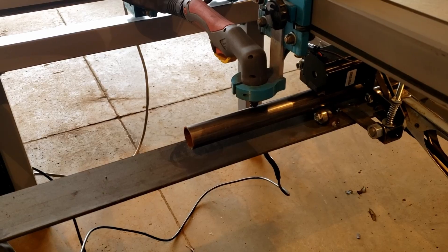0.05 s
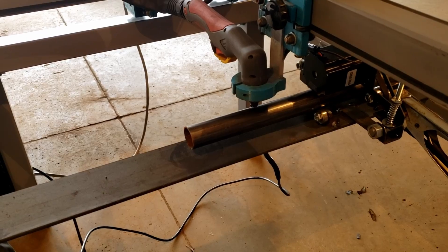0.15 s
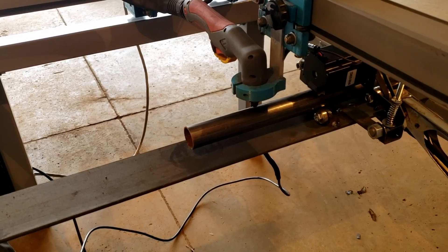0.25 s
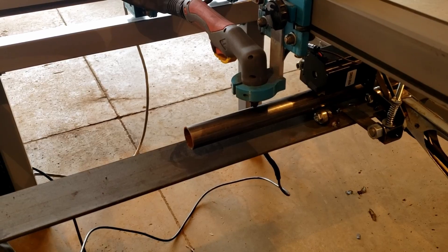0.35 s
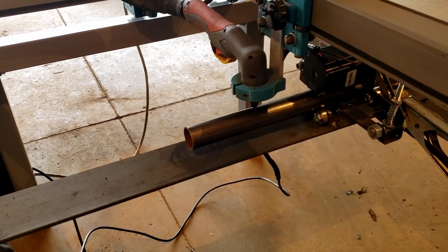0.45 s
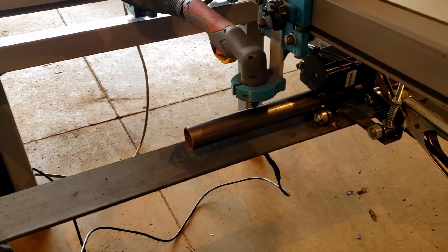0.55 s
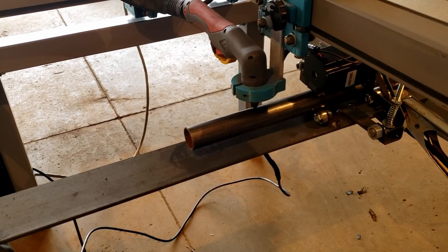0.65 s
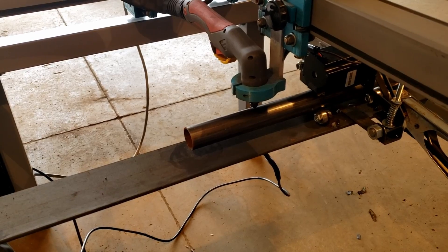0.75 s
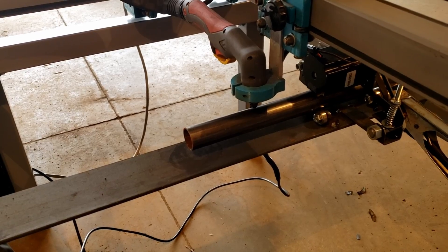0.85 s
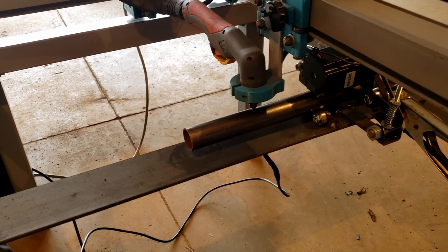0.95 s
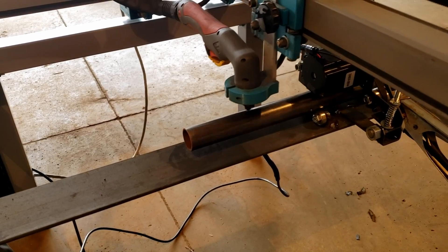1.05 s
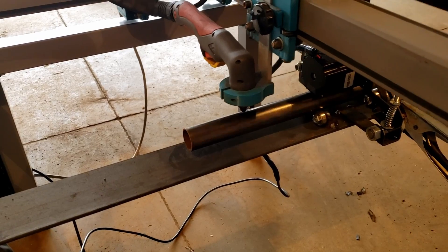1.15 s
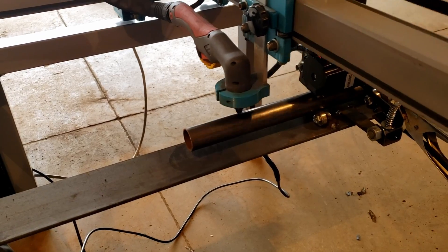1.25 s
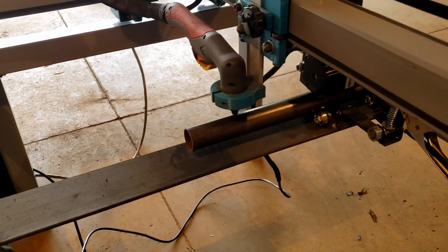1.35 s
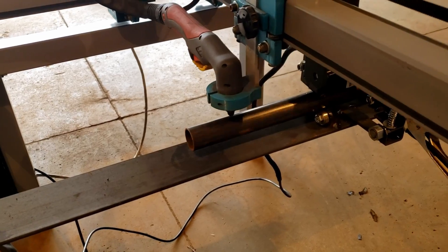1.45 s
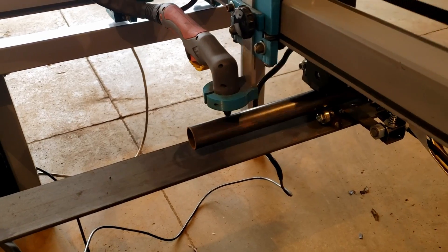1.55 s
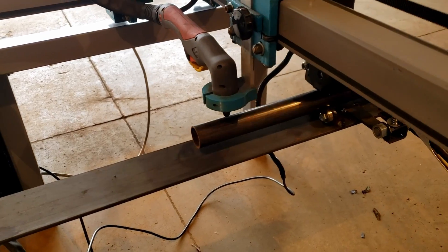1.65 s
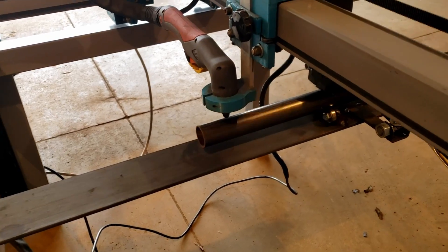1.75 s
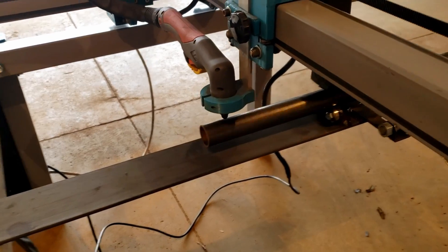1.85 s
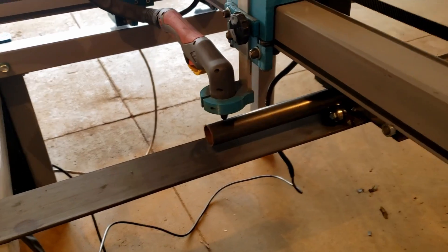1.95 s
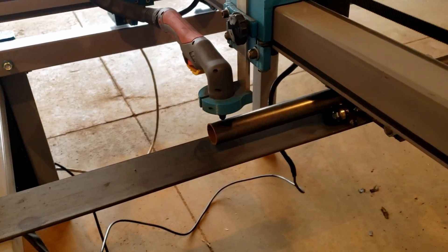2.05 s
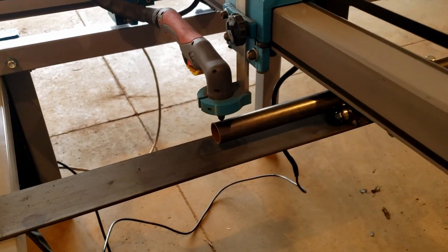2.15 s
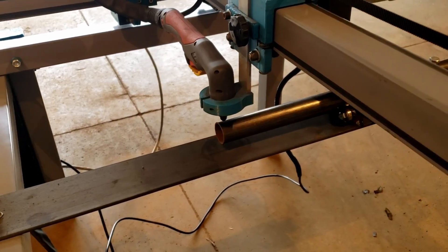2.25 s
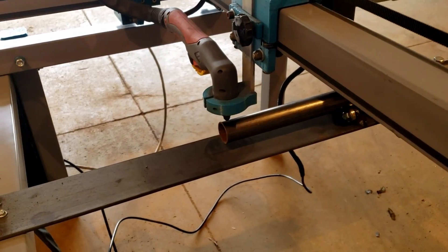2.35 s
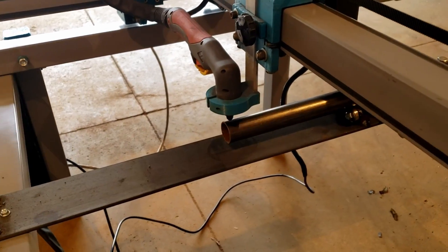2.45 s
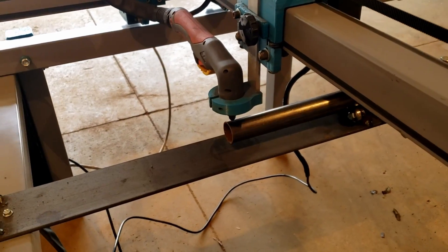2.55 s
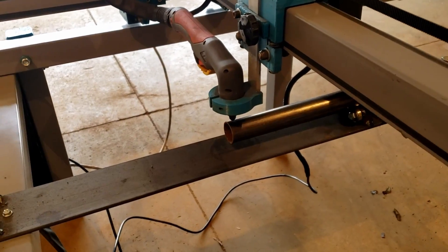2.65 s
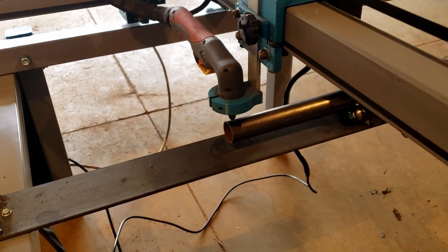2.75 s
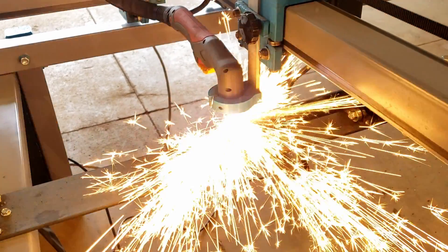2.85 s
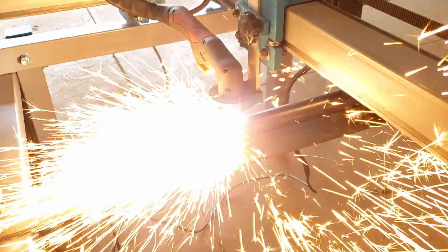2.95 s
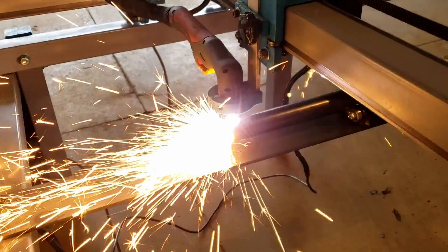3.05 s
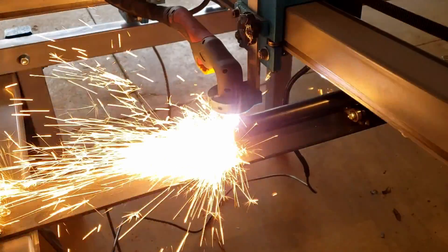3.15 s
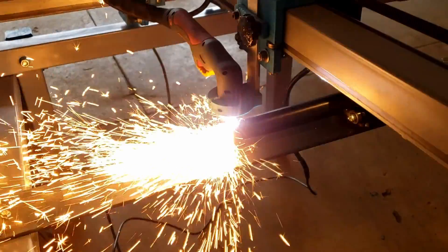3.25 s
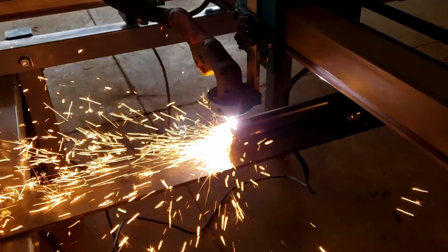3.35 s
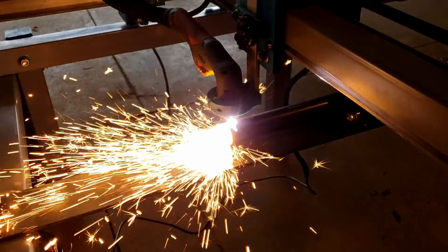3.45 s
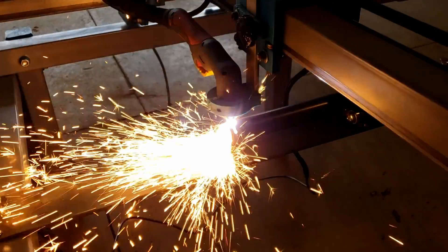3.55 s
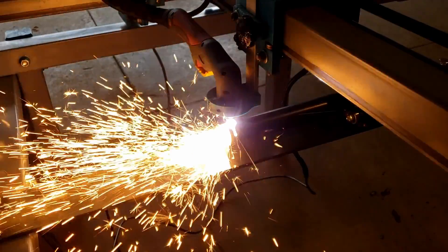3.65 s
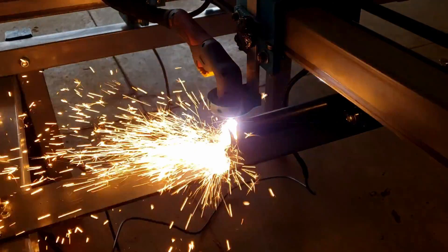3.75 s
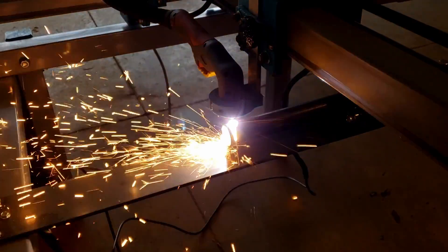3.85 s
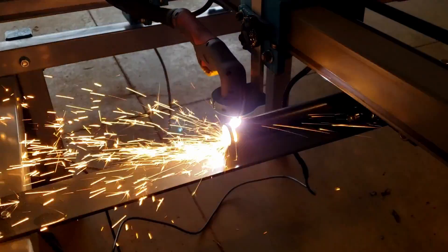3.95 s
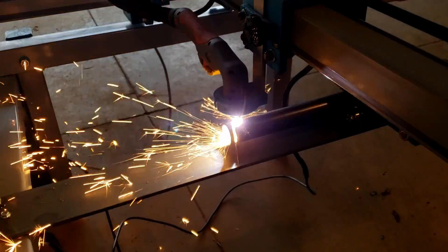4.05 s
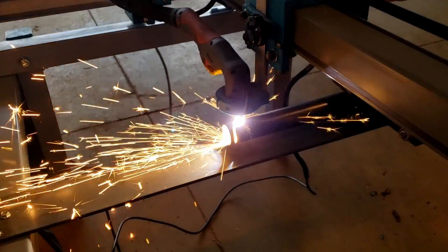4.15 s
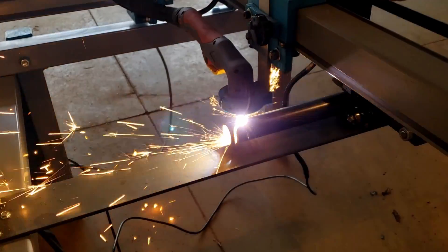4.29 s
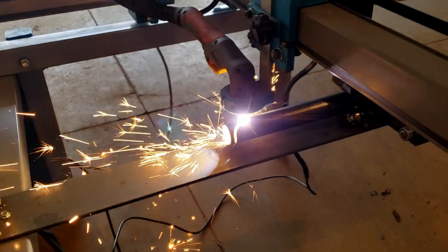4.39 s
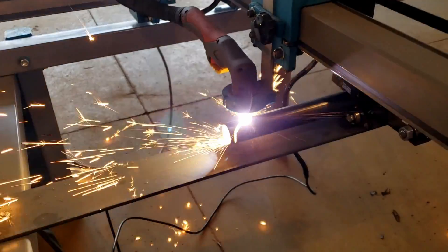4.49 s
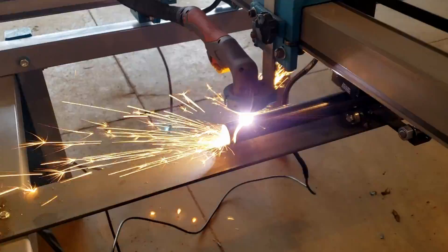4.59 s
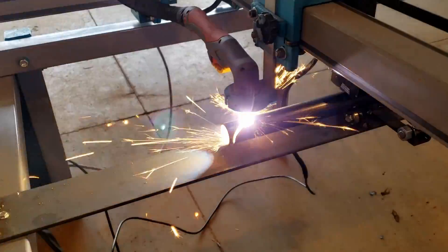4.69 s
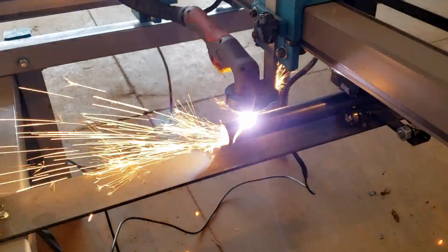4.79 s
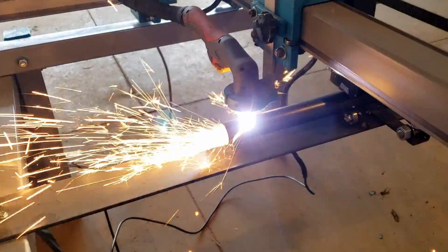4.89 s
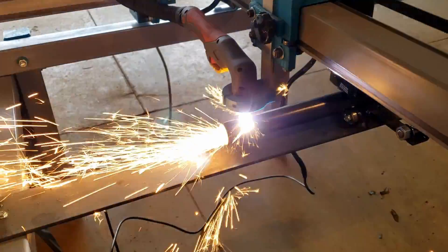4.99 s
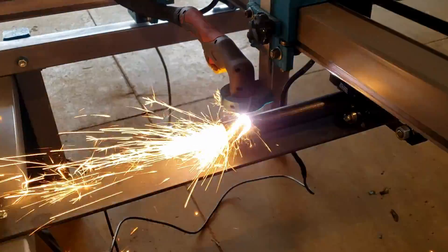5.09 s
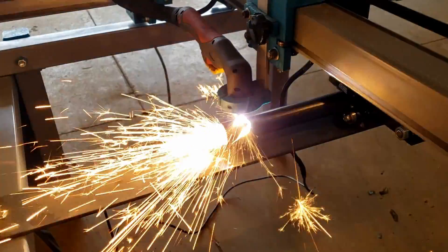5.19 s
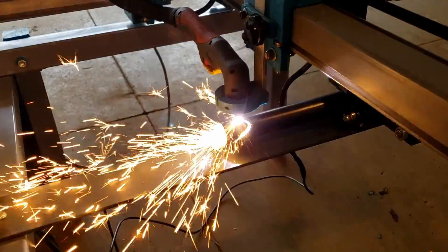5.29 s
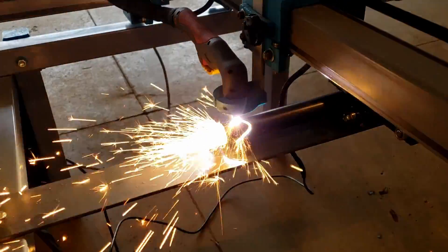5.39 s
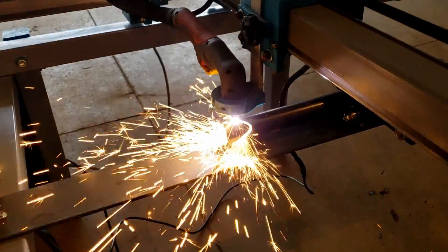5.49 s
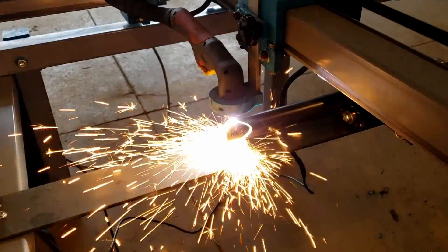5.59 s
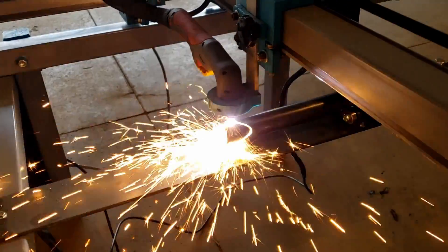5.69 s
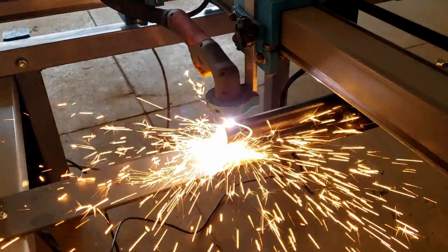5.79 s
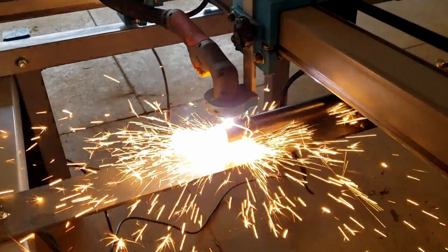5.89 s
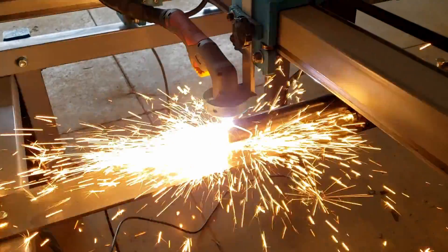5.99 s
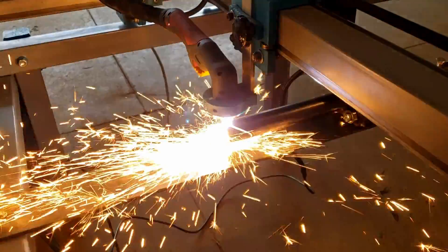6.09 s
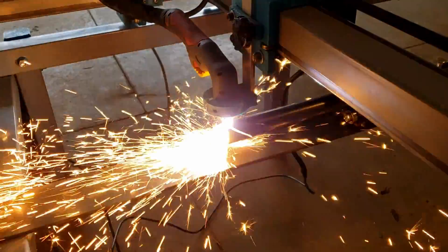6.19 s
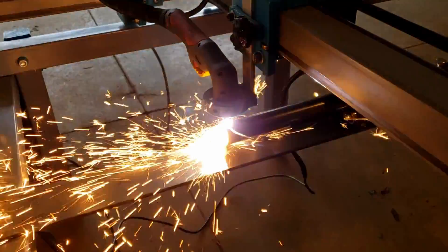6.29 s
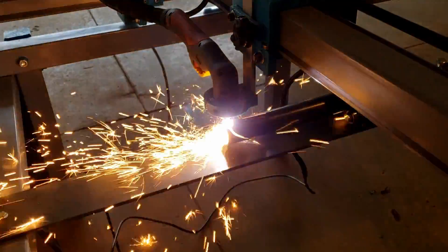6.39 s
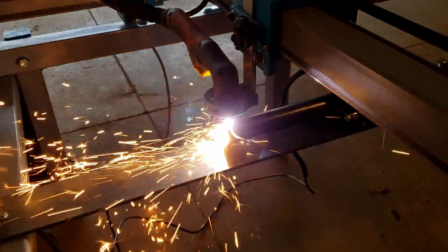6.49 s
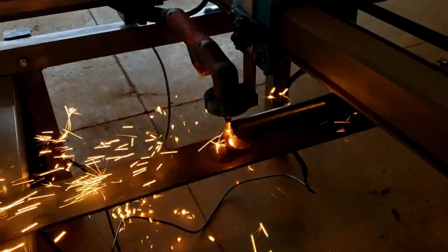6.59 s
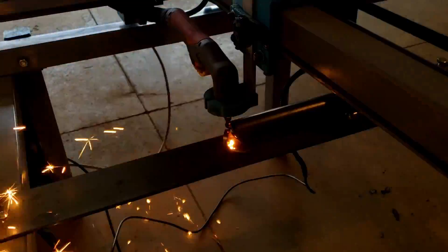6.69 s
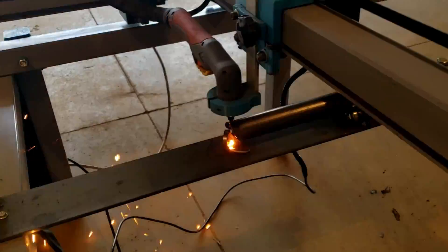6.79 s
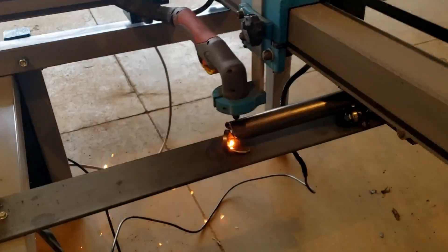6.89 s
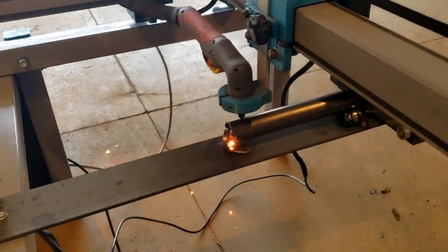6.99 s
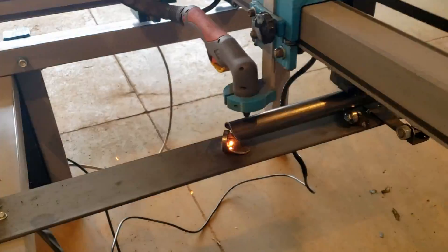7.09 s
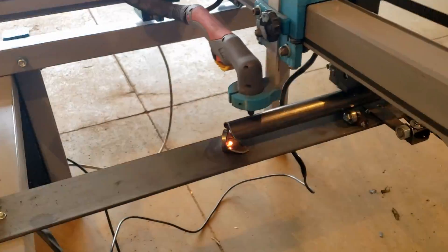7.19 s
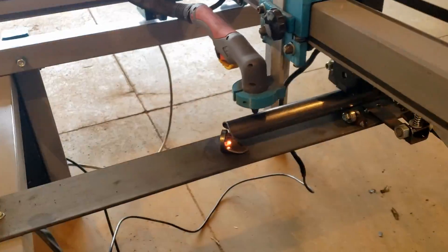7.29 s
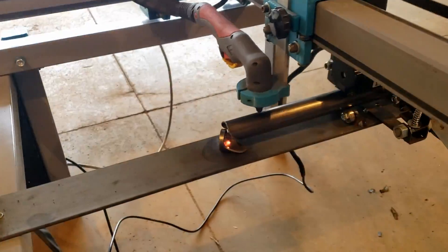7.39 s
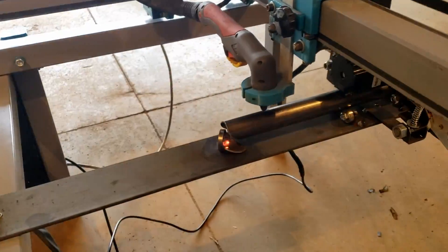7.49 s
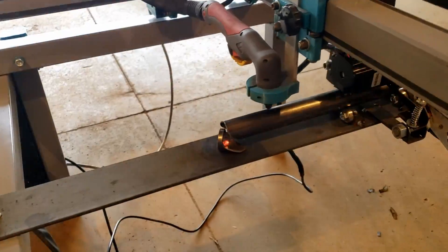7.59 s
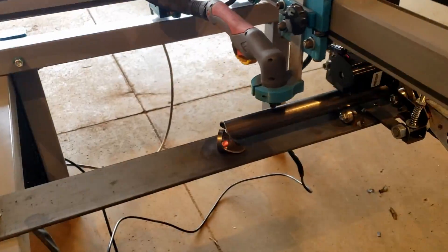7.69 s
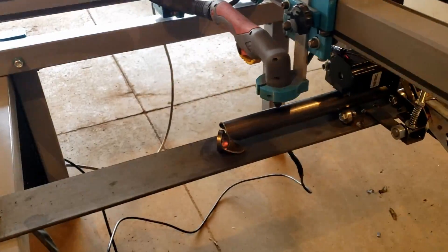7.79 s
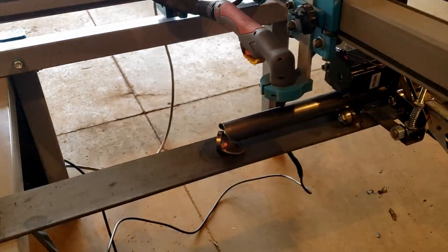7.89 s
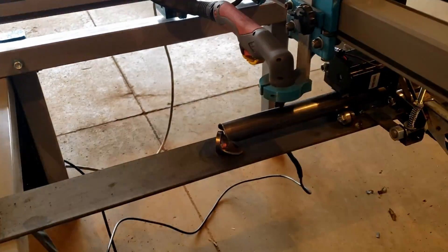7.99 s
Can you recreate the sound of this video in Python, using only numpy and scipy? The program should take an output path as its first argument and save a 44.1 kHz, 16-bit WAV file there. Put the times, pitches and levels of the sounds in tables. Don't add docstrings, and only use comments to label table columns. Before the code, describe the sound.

A workshop heard through a close hand-held stereo microphone. From 0 s, low distant rumble, a fan and leaking air; a small motor hums from 0.5 s. At 1 s a stepper carriage jerks off, rolling with a steady, many-pitched electric whine; a thin relay click at 2.0 s. It clanks and chirps to a stop around 2.25 s, then rocks with repeated small squeaks until about 2.75 s. At 2.8 s gas pops, the arc snaps, metal rings and bright noise splashes; the wall is pierced at 2.95 s. A loud fluttering hiss cuts the turning tube, flaring at times, with lumpy low overload, a thin rising whistle from 3.3 s and hollow bore tones sinking to about 4.8 s, then rising. Soft slag thuds come near 5.4 and 5.9 s. At 6.6 s a dull snap and thud end the cut. Cooling air fades, then brightens towards 8 s over faint motor hum.

```python
import sys
import numpy as np
from scipy import signal
from scipy.fft import rfft, irfft, next_fast_len
from scipy.io import wavfile
from scipy.ndimage import uniform_filter1d, map_coordinates

SR = 44100
rng = np.random.default_rng(int(sys.argv[2]) if len(sys.argv) > 2 else 0)


def file_out(sig):
    cols = np.atleast_2d(sig).T
    lim = np.clip(cols, -1, 1)
    pcm = np.round(lim * 32767).astype(np.int16)
    wavfile.write(sys.argv[1], SR, pcm)


def how_loud(loudness_db):
    steps = np.asarray(loudness_db, float) / 20
    return 10 ** steps


N = 354563

START_S, STOP_S, SPIN_UP_S, SPIN_DOWN_S = 0.98, 2.245, 0.045, 0.07
STRIKE_S, PIERCE_S, CUT_OFF_S = 2.8, 2.953, 6.63

# f/Hz, likeness/-1..1
SHOP_ALIKE = [(60, 0.87), (130, 1), (290, 0.6), (640, 0.31), (1410, -0.17), (3100, -0.1), (6820, -0.47),
              (15000, 0.086)]
# f/Hz, left minus right/dB
SHOP_LEAN = [(60, 5), (270, 3), (600, 4), (2000, 4), (5800, -2.5), (6700, 40), (8500, 11), (10000, -4),
             (12000, -2.5), (14000, 9), (15000, 5)]
# f/Hz, likeness/-1..1
JET_ALIKE = [(200, 0.25), (400, 0.89), (1000, 0.48), (2400, 0.32), (4400, 0.21), (8000, 0.34),
             (11000, 0.48), (15000, 0.48)]
# f/Hz, lead/rad
JET_LEAD = [(0, -4), (1810, 1), (2330, -0.5), (2760, 2.5), (3100, -0.1), (3790, -0.3), (4310, 0.25),
            (6200, 2.5), (6980, 8), (7920, 7.5), (11100, 9.5), (13600, 14.5), (15200, -8), (16500, 17)]
# t/s, mode spacing/Hz, echo strength/0-1
BORE = [(2.8, 500, .3), (3.15, 494, .42), (3.55, 498, .42), (3.72, 540, .3), (3.92, 562, .5),
        (4.15, 526, .5), (4.35, 478, .6), (4.62, 412, .8), (4.78, 389, .88), (4.95, 412, .86),
        (5.1, 455, .62), (5.25, 480, .62), (5.45, 494, .55), (5.7, 484, .5), (5.88, 468, .45),
        (6.1, 464, .3), (6.35, 452, .25), (6.7, 480, .2)]
# t/s, level/dB, length/s
FLARES = [
    (3.125, 5.5, 0.082),
    (3.37, 5.5, 0.051),
    (5.06, 5, 0.1),
    (5.46, -0.5, 0.026),
    (5.65, 3, 0.025),
    (6.03, 1.5, 0.04),
    (6.42, 4.5, 0.082),
    (6.55, 1, .03),
]


def unit(x):
    return x / np.sqrt(np.mean(x ** 2) + 1e-20)


def along(points, hz):
    f, v = np.transpose(points)
    return np.interp(np.log(hz + 1), np.log(f + 1), v)


def curves(rows):
    s, *cols = np.transpose(rows)
    return [np.interp(np.arange(N) / SR, s, c) for c in cols]


def gate(rows, rise_s, fall_s):
    t = np.arange(N) / SR
    rise = np.clip((t - rows[0][0]) / rise_s, 0, 1)
    return rise * np.clip((rows[-1][0] - t) / fall_s + 1, 0, 1)


def span(start, end, rise_s, fall_s):
    return gate([[start], [end]], rise_s, fall_s)


def bumps(rows):
    t = np.arange(N) / SR
    return sum(height * np.exp(-((t - s) / length) ** 2) for s, height, length in rows)


def wobble(rate):
    return map_coordinates(rng.standard_normal(int(N * rate / SR) + 4), [np.arange(N) * rate / SR])


def filtered(x, response):
    m = next_fast_len(N + 8192)
    return irfft(rfft(x, m) * response(np.fft.rfftfreq(m, 1 / SR)), m)[..., :N]


def resonances(peaks):
    def response(f):
        return sum((-1) ** k * how_loud(db) * 1j * f * w / (c * c - f * f + 1j * f * w)
                   for k, (c, w, db) in enumerate(peaks))
    return response


def patchy(depth_db, shape=lambda hz, t: 1):
    hz, t, z = signal.stft(rng.standard_normal((2, N)), SR, nperseg=1024)
    field = uniform_filter1d(rng.standard_normal(z.shape[1:]), 10, 0)
    field = uniform_filter1d(field, 5, 1)
    z = z * how_loud(depth_db * unit(field)) * shape(hz[:, None], t)
    return signal.istft(z, SR, nperseg=1024)[1][:, :N]


def spread(pair, gain, alike, lean, lead=((1, 0),)):
    def mix(hz):
        turn = np.arccos(np.clip(along(alike, hz), -1, 1)) / 2
        phase = np.exp(.5j * np.outer([1, -1], along(lead, hz)))
        share = phase / np.sqrt(1 + how_loud(np.outer([-1, 1], along(lean, hz))) ** 2)
        both = np.array([[np.cos(turn), np.sin(turn)], [np.cos(turn), -np.sin(turn)]])
        return gain(hz) * share[:, None] * both
    m = next_fast_len(N + 8192)
    out = irfft((mix(np.fft.rfftfreq(m, 1 / SR)) * rfft(pair, m)).sum(1), m)[:, :N]
    return out / np.sqrt(np.mean(out.mean(0) ** 2))


def tone(hz, shake_db, lean_db):
    phase = 2 * np.pi * (np.cumsum(hz * np.ones(N)) / SR + rng.random()) + rng.normal(0, .3, (2, 1))
    knots = np.linspace(0, N, num=50)
    drift = np.array([np.interp(np.arange(N), knots, rng.standard_normal(50)) for _ in range(2)])
    return np.sqrt(2) * np.sin(phase) * how_loud(shake_db * drift + [[lean_db / 2], [-lean_db / 2]])


def narrow(hz, width_hz):
    pole = np.exp(-np.pi * width_hz / SR)
    slow = signal.lfilter([1], [1, -pole], rng.standard_normal((2, N)))
    phase = 2 * np.pi * np.cumsum(hz * np.ones(N)) / SR
    return unit(slow[0] * np.cos(phase) + slow[1] * np.sin(phase))


def shop():
    # f/Hz, level/dB per Hz
    rumble_colour = [(15, -71), (25, -25), (63, 2.5), (81, 2.5), (92, -1.5), (155, -10.5), (178, -15),
                     (195, -9.5), (232, -15.5), (260, -25), (344, -50), (377, -22), (400, -38), (520, -69),
                     (880, -120)]
    # f/Hz, level/dB per Hz
    thin_colour = [(15, -66), (25, -27), (70, -9), (87, -7.5), (102, -14), (147, -28), (168, -9),
                   (230, -10.5), (252, -19), (345, -11.5), (377, -22), (438, -3), (557, -27), (677, -11.5),
                   (900, -32), (1170, -50), (1980, -120)]
    # f/Hz, level/dB per Hz
    air_colour = [(180, -24), (300, -9), (378, -15.5), (418, -21), (469, -11), (493, -12), (759, -15.5),
                  (1170, -11), (1360, -15.5), (2160, -28.5), (3260, -12), (6990, -12.5), (7980, -22),
                  (9200, -19.5), (10000, -13.5), (12000, -11), (12700, -13.5), (13500, -8), (14500, -10),
                  (15800, -10.5)]
    # f/Hz, width/Hz, level/dB
    fan_bands = [(191, 17, -0.5), (1188, 35, -6.5), (75.4, 14.6, 4)]
    # f/Hz, level/dB
    hum_tones = [(186, -90), (226, -85.5)]
    # t/s, level/dB
    quiet_gain = [
        (0, -5.5),
        (.1, -6.5),
        (.8, -5),
        (1.03, -0.5),
        (1.26, 1),
        (2.0, -0.5),
        (2.26, 0),
        (2.74, -1.5),
        (2.762, -3),
        (2.79, -4),
    ]
    t = np.arange(N) / SR
    quiet_db, = curves(quiet_gain)
    ducked_db = -2.5 - 110 * (t - STRIKE_S)
    back_db = np.maximum(ducked_db, -18.5 + 2.5 * (t[-1] - t))

    def noise(gain, depth_db):
        return spread(patchy(depth_db), gain, SHOP_ALIKE, SHOP_LEAN)

    rumble = noise(lambda hz: how_loud(along(rumble_colour, hz)) + how_loud(-11.5) * resonances(fan_bands)(hz), 0.5)
    air = noise(lambda hz: how_loud(along(air_colour, hz)), 0.2)
    after_cut_db, surge_db, settle_s = -68, 5, .1
    thin = noise(lambda hz: how_loud(along(thin_colour, hz)), 1)
    thin += sum(how_loud(db - after_cut_db) * narrow(hz, width_hz=7) for hz, db in hum_tones)
    lull_db = bumps([(2.785, -12, .02)])
    rumble_db = -44 + np.where(t < STRIKE_S, quiet_db, ducked_db) + lull_db - wobble(12.83)
    air_db = -49 + np.where(t < STRIKE_S, quiet_db, back_db)
    thin_db = after_cut_db + surge_db * np.exp(-np.abs(t - CUT_OFF_S) / settle_s)
    after = span(CUT_OFF_S + 0.033, 9, 0.044, 1) * how_loud(thin_db) * thin
    return how_loud(rumble_db) * rumble + how_loud(air_db) * air + after


def axis_motor():
    # start/s, end/s, first f/Hz, sag/Hz per s, level/dB
    lifts = [
        (0.499, 2.33, 466.5, 9, -70.5),
        (6.8, 9.8, 459, 8, -86),
    ]
    t = np.arange(N) / SR
    out = 0
    for s, end, hz, sag, db in lifts:
        pitch = hz - sag * (t - s) + 3 * wobble(25)
        out = out + span(s, end, .05, .08) * how_loud(db) * tone(pitch, shake_db=2.0, lean_db=5)
    return out


def rolling():
    # f/Hz, level/dB per Hz
    roll_colour = [(120, -18), (200, 1), (621, -10.5), (832, -1), (911, -8.5), (1580, -11.5), (2310, -15),
                   (2440, -9.5), (2730, -17), (3460, -10), (5360, -15.5), (6800, -11), (8310, -25),
                   (10300, -24), (11500, -15), (12800, -32), (14400, -14), (15100, -22), (15800, -12.5)]
    t = np.arange(N) / SR
    step_hz, jerk_db, jerk_s = 833.3, 4.5, 0.038
    beat = 1 + .45 * np.sin(2 * np.pi * step_hz / 4 * t)
    roll = beat * spread(patchy(2.45), lambda hz: how_loud(along(roll_colour, hz)), SHOP_ALIKE, SHOP_LEAN)
    roll_db = -49.5 + bumps([(START_S + jerk_s, jerk_db, jerk_s), (STOP_S, jerk_db, jerk_s)])
    coast_db = -60.0 - 10 * (t - 2.5) + 10.0 * np.exp(-np.abs(t - STOP_S) / 0.071)
    shiver = roll + how_loud(-5.5) * narrow(2700, width_hz=330)
    coast = span(2.27, 2.77, 0.0078, 0.029) * how_loud(coast_db) * shiver
    return span(START_S - .02, STOP_S + 0.025, 0.053, 0.12) * how_loud(roll_db) * roll + coast


def step_tones():
    # f/Hz, level at start/dB, midway/dB, at end/dB
    strong_tones = [(833.3, -54, -53, -51), (2499.8, -62, -54.5, -55), (3333.3, -51, -55.5, -56),
                    (3541.7, -51, -51.5, -63), (6562.5, -59, -59.5, -67)]
    # f/Hz, level/dB
    weak_tones = [(3752, -66), (6250, -69), (6352, -70), (6665, -68), (7187, -71), (9792, -74),
                  (11041, -70), (11876, -72), (12710, -75), (13227, -74), (13437, -73), (14373, -66),
                  (14896, -69),
                  (280, -61), (556, -66), (754, -65), (2083, -71), (3230, -69), (3440, -68), (416, -68),
                 (375, -68)]
    t = np.arange(N) / SR
    place = np.linspace(START_S + SPIN_UP_S, STOP_S, num=3)
    out = 0
    for hz, *db in strong_tones:
        enters = span(START_S + .09 * (hz == 2499.8), 9, .04, 1)
        out = out + enters * how_loud(np.interp(t, place, db)) * tone(hz, shake_db=.5, lean_db=4)
    for hz, db in weak_tones:
        out = out + how_loud(db + 1.5) * tone(hz, shake_db=1, lean_db=3)
    return span(START_S, STOP_S, SPIN_UP_S, SPIN_DOWN_S) ** 2 * out


def clanks():
    # t/s, level/dB, length/s
    jolts = [
        (1.0, -61, .02),
        (1.03, -62, .025),
        (2.25, -55, .008),
        (2.272, -52, .011),
        (2.297, -57, .01),
        (2.33, -63, .03),
    ]
    # f/Hz, width/Hz, level/dB
    frame = [(1290, 90, 0), (2100, 80, -1), (2500, 80, -5), (3400, 120, -5), (5750, 150, -5),
             (6100, 120, -4), (7270, 100, -4)]
    jerks = bumps([(s, how_loud(db), length) for s, db, length in jolts])
    return jerks * spread(patchy(3), lambda hz: resonances(frame)(hz) ** 2, JET_ALIKE, SHOP_LEAN)


def chirps():
    # t/s, f/Hz, level/dB, length/s
    chirp_bursts = [(1.037, 2010, -56, 0.028), (2.236, 5750, -55, .012), (2.255, 2120, -46.5, 0.0087),
                    (2.271, 1290, -41, 0.0078), (2.272, 7300, -47, 0.005), (2.274, 6110, -48, 0.0062),
                    (2.284, 2110, -50, .011), (2.286, 7270, -56, .008), (2.29, 2500, -52, .012),
                    (2.297, 1290, -51, 0.0034), (2.296, 6110, -61, .007), (2.297, 4120, -57, .009),
                    (2.271, 3333, -52.5, 0.028)]
    return sum(bumps([(s, how_loud(db), length)]) * tone(hz, shake_db=-1.5, lean_db=7)
               for s, hz, db, length in chirp_bursts)


def tick():
    start_s, peak_db, t60_s, low_hz = 2.0094, -30.5, .0022, 5500
    t, out = np.arange(400) / SR, np.zeros(N)
    burst = rng.standard_normal(len(t)) * how_loud(-60 * np.abs(t - .0006) / t60_s)
    click = signal.lfilter(*signal.butter(4, low_hz, "high", fs=SR), burst)
    out[round(start_s * SR):][:len(t)] = how_loud(peak_db) * click / np.abs(click).max()
    return out * how_loud([[1.5], [-1.5]])


def squeaks():
    # f/Hz, width/Hz, level/dB, delay/s
    slack_parts = [(2400, 80, -60, .014), (3900, 80, -52, 0)]
    t = np.arange(N) / SR
    first_s, period_s = 2.364, .108
    out = 0
    for way, (hz, width, db, delay) in zip((-1, 1), slack_parts):
        age = t - first_s - delay
        swing = sum(np.exp(-((age - k * period_s) / .013) ** 2) for k in range(4))
        glide = 0.05 * np.sin(2 * np.pi * age / period_s)
        out = out + how_loud(db) * swing * narrow(hz * (1 + way * glide), width)
    return out * how_loud([[1.5], [-1.5]])


def jet_noise(pair, gain):
    # f/Hz, left minus right/dB
    jet_lean = [(300, 1), (700, 2), (1300, 3), (2400, 5.5), (4400, -1), (6100, 0), (6600, 12), (8900, 12),
                (9800, 2), (11200, -4), (12500, 1), (13500, 7), (14500, 17), (15200, 24), (15800, 27)]
    return spread(pair, gain, JET_ALIKE, jet_lean, JET_LEAD)


def pilot():
    # t/s, level/dB
    pilot_level = [
        (2.8, -32.5),
        (2.806, -38),
        (2.814, -42),
        (2.824, -47),
        (2.834, -46),
        (2.845, -41),
        (2.93, -42),
        (2.95, -39),
        (2.96, -48),
    ]
    # f/Hz, width/Hz, level/dB
    nozzle = [(4500, 800, 0), (6800, 1100, -4)]
    hiss = jet_noise(patchy(1.8), resonances(nozzle))
    return gate(pilot_level, .001, .004) * how_loud(curves(pilot_level)[0] + 1) * hiss


def ladder(hz, t):
    s, spacing, echo = np.transpose(BORE)
    back = np.interp(t, s, echo) / (1 + (hz / 3000) ** 2) / (1 + (550 / (hz + 1)) ** 4)
    round_trip = np.cos(2 * np.pi * hz / np.interp(t, s, spacing))
    return np.sqrt((1 - back ** 2) / (1 + back ** 2 - 2 * back * round_trip))


def shaded_ladder(hz, t):
    clears_s, edge_hz, climb_hz_per_s, shade_db, soft_hz = 7, 4300, 10998, -1.5, 500
    edge = edge_hz + climb_hz_per_s * np.maximum(t - clears_s, 0)
    shadow = np.clip((t - PIERCE_S) / .5, 0, 1) * (1 + np.tanh((hz - edge) / soft_hz)) / 2
    return ladder(hz, t) * how_loud(shade_db * shadow)


def hidden(hz, t):
    start, end, centre_hz, width_hz, dent_db = 3.25, 5.85, 10900, 900, -3.5
    behind = np.interp(t, [start, start + .15, end - .1, end + .1], [0, 1, 1, 0])
    return how_loud(dent_db * behind * np.exp(-((hz - centre_hz) / width_hz) ** 2))


def ringing():
    # multiple of the spacing, level under the bore noise/dB
    pipe_modes = [(2, -8), (3, -4.5), (4, -4), (5, -17), (6, -9), (7, -11), (8, -17), (9, -20)]
    spacing, echo = curves(BORE)
    modes = sum(how_loud(db - 2 + 4.5 * wobble(28)) * narrow(k * spacing, width_hz=14 + 5 * k)
                for k, db in pipe_modes)
    modes += span(4.75, 5.6, .05, .2) * how_loud(-13) * narrow(spacing, width_hz=25)
    return (echo / .8) ** 2 * modes * how_loud([[1.2], [-1.2]])


def levels():
    # t/s, power level/dB, level of the highest noise beamed at the near port/dB
    arc = [(2.8, -49, -58), (2.84, -40, -31), (2.955, -44, -27.5), (2.99, -40, -26), (3.05, -43, -32),
           (3.27, -43.5, -29.5), (3.37, -49, -38), (3.46, -45, -30.5), (3.6, -46.5, -33.5),
           (4.02, -48, -26), (4.61, -47.5, -27.5), (4.96, -47.5, -31), (5.31, -47.5, -32),
           (5.73, -44.5, -26.5), (5.88, -43.5, -31.5), (6.07, -40.5, -32), (6.5, -40, -34.5),
           (6.62, -42, -25)]
    # t/s, flow level/dB
    flow = [
        (6.66, 11),
        (6.74, 7),
        (6.84, 3.5),
        (7.06, 0.5),
        (7.6, -0.5),
        (7.85, 1.5),
        (8.04, 3.5),
    ]
    t = np.arange(N) / SR

    def column(v):
        return np.array(v)[:, None]

    power_db, beam_db = curves(arc)
    flare_db = bumps(FLARES)
    first_crackle, spray_turns, tube_shades = (2.816, 10, 0.008), (5.63, 3.5, .14), (5.72, -5.5, 0.18)
    hot = np.array([
        -49.5 + 0.78 * (power_db - power_db.mean()) + bumps([first_crackle]),
        power_db + bumps([spray_turns]),
        power_db + 4 + bumps([tube_shades]),
        beam_db + flare_db,
        19 + 0.5 * (beam_db - beam_db[-1]) + 0.49 * flare_db])
    valve_pop = np.exp(-np.abs(t - STRIKE_S) / .0035)
    blowback = span(2.83, PIERCE_S, 0.012, 0.0093)
    last_burst = np.clip((t - CUT_OFF_S) / 0.026 + 1.75, 0, 1)
    hot += column((-18, 12, 22, 21, -4)) * valve_pop
    hot += column((-4.5, 2.5, 6, 4, -11)) * blowback
    hot += column((2, 3, 7.5, -5, -15)) * last_burst
    cold = column((-66, -57, -53.5, -46)) + column((1.5, 0.9, 0.86, 0.26)) * curves(flow)[0]
    cold = np.vstack([cold, np.interp(t, (6.9, 7.6), (12, 3))])
    return hot + (cold - hot) * np.clip((t - CUT_OFF_S) / 0.024, 0, 1)


def cooling_nozzle(sizzle_db):
    # f/Hz, width/Hz, level/dB
    cold_nozzle = [(4730, 400, -9.5), (11200, 830, -1), (14600, 960, -2.5)]
    facing_db = curves([(7.2, 0), (7.9, 11.5)])[0]
    hiss = jet_noise(patchy(1.2), resonances(cold_nozzle))
    return span(6.7, 8.1, 0.21, .1) * how_loud(sizzle_db - 4.5 + facing_db) * hiss


def jet():
    # f/Hz, level/dB per Hz
    jet_colour = [(150, -36), (250, -26), (423, -8.5), (643, -6), (949, -2), (1090, -6), (1230, 0.5),
                  (1700, -2), (1860, -2), (2370, -2), (3610, -5), (4320, 0), (6000, 0), (6970, 2),
                  (9000, -21), (11700, -24), (19800, -120)]
    # f/Hz, level/dB per Hz
    top_colour = [(6500, -37), (7200, -16.5), (8050, -26), (8800, -24.5), (9700, -22), (11000, -13.5),
                  (11800, -10.5), (13000, -9), (14200, -3), (15100, 4.5), (15700, 2), (16000, -2)]
    bore_db, body_db, sizzle_db, top_db, pan_db = levels()

    def above(hz, edge):
        return 1 / np.sqrt(1 + (edge / (hz + 1)) ** 16)

    def below(hz, edge):
        return np.sqrt(1 - above(hz, edge) ** 2)

    low, high = patchy(1.2, shaded_ladder), patchy(1.5, hidden)
    bore = jet_noise(low, lambda hz: how_loud(along(jet_colour, hz)) * below(hz, 2400))
    body = jet_noise(low, lambda hz: how_loud(along(jet_colour, hz)) * above(hz, 2530))
    sizzle = jet_noise(high, lambda hz: how_loud(along(top_colour, hz)) * below(hz, 11600))
    top = jet_noise(high, lambda hz: how_loud(along(top_colour, hz)) * above(hz, 15900))
    reach_db = -17 + 1.5 * bumps(FLARES)
    top += how_loud(reach_db) * jet_noise(high, lambda hz: above(hz, 12260) * below(hz, 16300))
    top[1] *= how_loud(10.5 - pan_db)
    hiss = how_loud(bore_db) * (0.72 * bore + ringing()) + how_loud(body_db) * body
    hiss += how_loud(sizzle_db) * sizzle + how_loud(top_db + 0.61 * wobble(220)) * top
    hiss += cooling_nozzle(sizzle_db)
    flutter_db = 0.099 * wobble(22) + 0.46 * wobble(70) + 0.25 * wobble(350)
    return span(STRIKE_S, 9, 0.001, 1) * how_loud(flutter_db) * hiss


def overload():
    # f/Hz, level/dB per Hz
    mud_colour = [(20, -42), (60, -1.5), (150, -2.5), (400, -6.5), (1200, -6), (4000, -53)]
    # t/s, level/dB, length/s
    puffs = [
        (2.85, 11, 0.3),
        (3.35, 7, 0.095),
        (3.65, 6.5, 0.053),
        (3.78, 8, 0.061),
        (4.4, 5.5, 0.45),
        (5.08, 7, 0.14),
        (5.94, 11.5, 0.18),
        (6.4, 9, 0.057),
        (6.63, 7, 0.14),
    ]
    high = filtered(rng.standard_normal((2, N)), lambda hz: np.abs(hz - 19000) < 900)
    squared = high ** 2
    mud = unit(filtered(squared - squared.mean(), lambda hz: how_loud(along(mud_colour, hz))))
    level_db = -63.5 + bumps(puffs) + 0.5 * wobble(12)
    near_far = how_loud([[6], [-14]])
    return span(STRIKE_S, CUT_OFF_S + 0.022, 0.0055, 0.06) * how_loud(level_db) * mud * near_far


def strikes():
    # t/s, peak level/dB, t60/s, dullness f/Hz
    cracks = [
        (2.8195, -31, .01, 3500),
        (6.609, -33, .02, 14000),
        (6.62, -35.5, .05, 700),
        (6.633, -29, 0.018, 1100),
    ]
    # t/s, peak level/dB, t60/s, dullness f/Hz
    thuds = [
        (5.442, -54, 0.06, 120),
        (5.92, -51, 0.15, 200),
        (5.979, -50, 0.13, 120),
        (6.606, -39.5, 0.16, 129),
    ]
    t, out = np.arange(SR // 10) / SR, np.zeros((2, N + SR))
    for s, db, t60, dull_hz in cracks + thuds:
        noise = rng.standard_normal((2, len(t)))
        burst = (noise[0] + .3 * noise) * how_loud(-60 * t / t60)
        crack = signal.lfilter(*signal.butter(2, dull_hz, fs=SR), burst)
        out[:, round(s * SR):][:, :len(t)] += how_loud(db) * crack / np.abs(crack).max()
    return out[:, :N] * how_loud([[1.5], [-1.5]])


def wall():
    # t/s, peak level/dB
    snaps = [
        (2.8195, -23),
        (2.8392, -17),
        (2.841, -27),
        (2.8483, -27),
        (2.8545, -29),
    ]
    # f/Hz, width/Hz, level/dB
    tube_modes = [(650, 110, 0), (1710, 170, -1), (3480, 400, -9), (4700, 600, -8), (7200, 900, -7)]
    # t/s, level/dB
    stir_level = [
        (2.97, -42.5),
        (3.02, -54),
        (3.12, -50),
        (3.17, -64),
        (3.9, -71),
        (4.2, -78),
        (5.4, -61.5),
        (5.7, -54),
        (6.1, -56),
        (6.6, -55),
    ]
    blows = np.zeros(N)
    for s, db in snaps:
        blows[round(s * SR)] = -how_loud(db)
    ring = filtered(blows, resonances(tube_modes))
    ring = ring * np.abs(blows).max() / np.abs(ring).max()
    stir_db = curves(stir_level)[0] + 2.1 * wobble(22)
    stir = gate(stir_level, .02, .02) * how_loud(stir_db) * narrow(1722, width_hz=56)
    return (ring + stir) * how_loud([[1.5], [-1.5]])


def splash():
    # t/s, level/dB
    splash_level = [
        (2.83, -44),
        (2.845, -33),
        (2.88, -28),
        (2.95, -30),
    ]
    # f/Hz, width/Hz, level/dB
    splash_band = [(12700, 2600, 0)]
    lean = [(11000, -2), (14000, 15)]
    hiss = spread(patchy(1.5), lambda hz: resonances(splash_band)(hz) ** 2, JET_ALIKE, lean, JET_LEAD)
    return gate(splash_level, .005, .006) * how_loud(curves(splash_level)[0]) * hiss


def whistle():
    # t/s, level/dB
    whistle_level = [(3.29, -53), (3.42, -53), (3.52, -57), (3.64, -50), (4.05, -50.5), (4.28, -52),
                     (4.42, -57), (4.7, -55), (4.85, -51), (5.2, -52), (5.35, -55), (5.5, -52), (5.7, -58),
                     (6.05, -53), (6.5, -57)]
    start, end, final_hz, climb_hz, heat_s = 3.29, 6.5, 12500, 1900, 2.07
    age = np.arange(N) / SR - start
    hz = final_hz - climb_hz * np.exp(-np.abs(age) / heat_s)
    db = curves(whistle_level)[0] - 1.5 + 3 * wobble(25)
    return span(start, end, .03, .05) * how_loud(db) * tone(hz + 30 * wobble(70), shake_db=1.5, lean_db=-3)


def scene():
    carriage = rolling() + step_tones() + clanks() + chirps() + squeaks()
    torch = pilot() + jet() + overload() + strikes() + wall() + splash() + whistle()
    return shop() + axis_motor() + carriage + tick() + torch


def low_pass(x):
    return signal.sosfilt(signal.butter(12, 16860, fs=SR, output="sos"), x)


def record(dry):
    mix = filtered(dry, lambda hz: hz < 15770)
    return low_pass(mix)


dry = scene()
out = record(dry)
file_out(out)
```